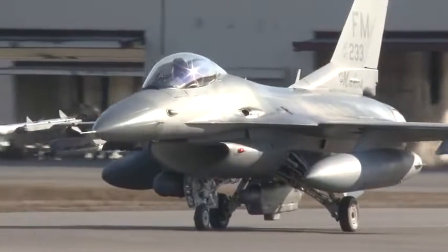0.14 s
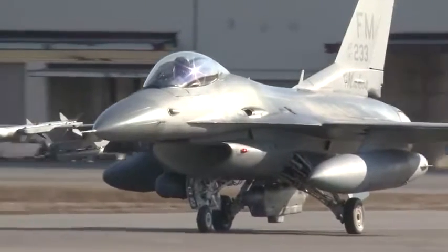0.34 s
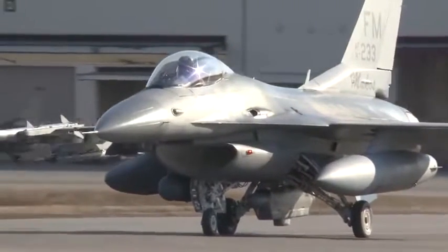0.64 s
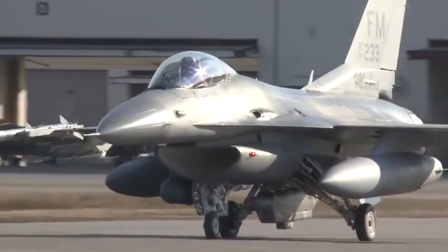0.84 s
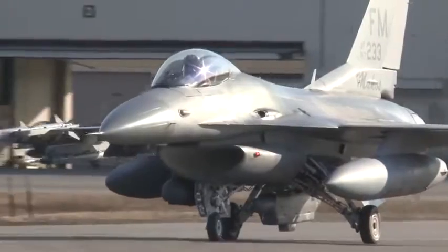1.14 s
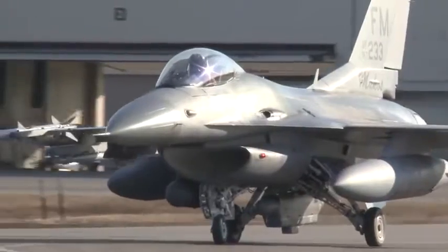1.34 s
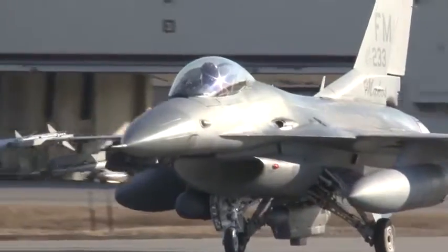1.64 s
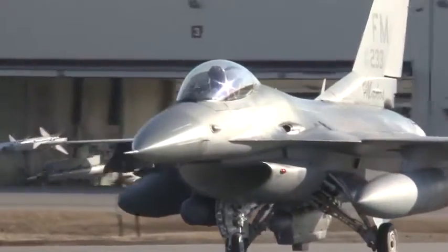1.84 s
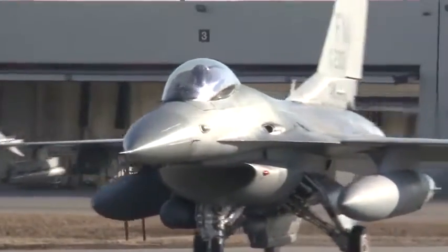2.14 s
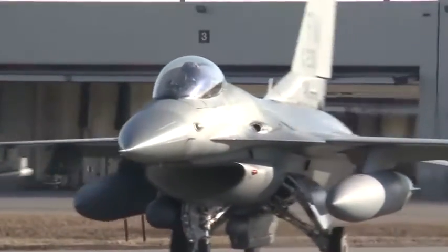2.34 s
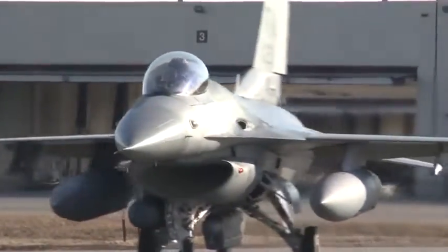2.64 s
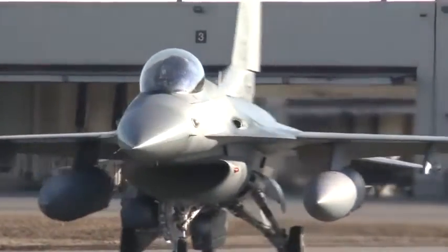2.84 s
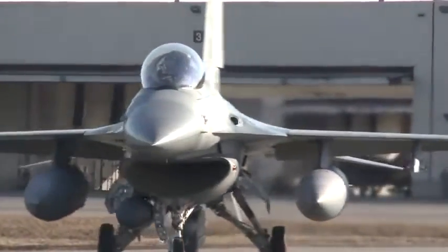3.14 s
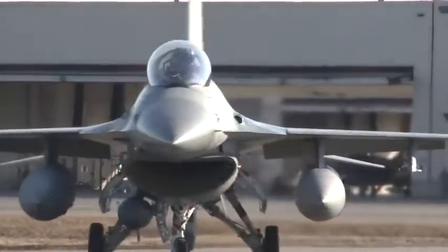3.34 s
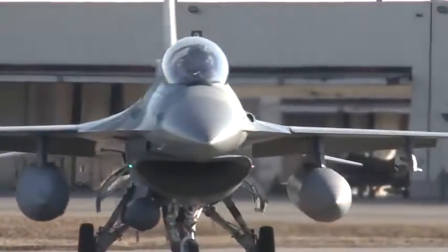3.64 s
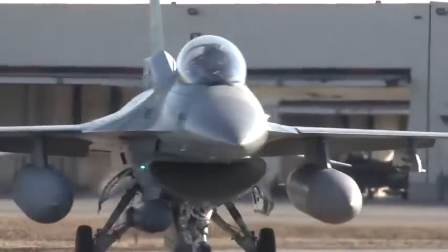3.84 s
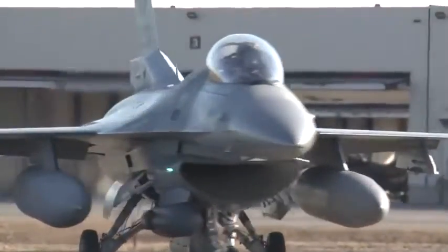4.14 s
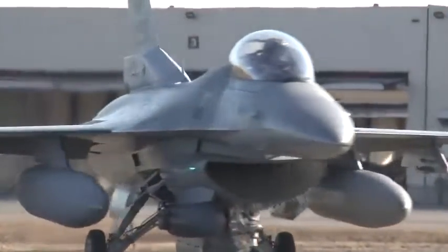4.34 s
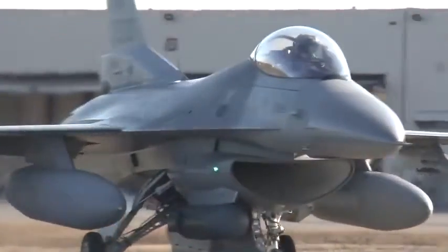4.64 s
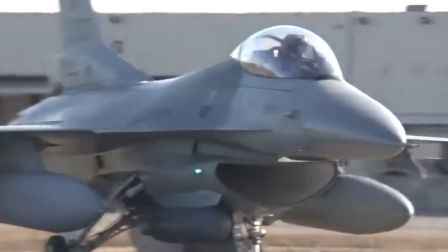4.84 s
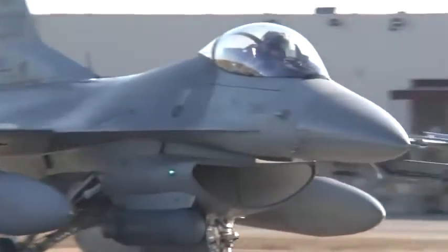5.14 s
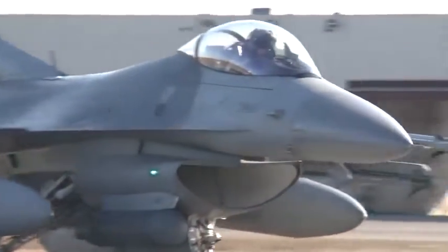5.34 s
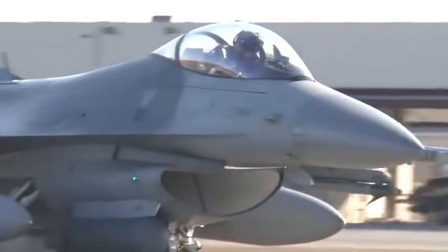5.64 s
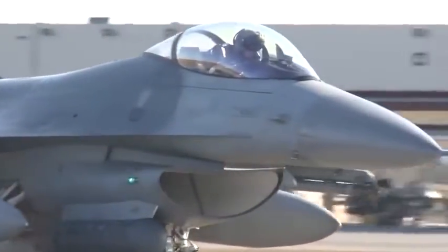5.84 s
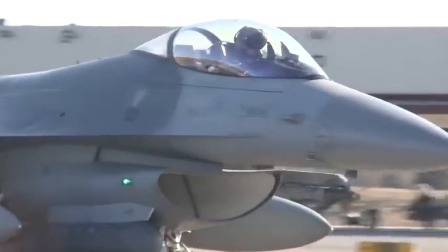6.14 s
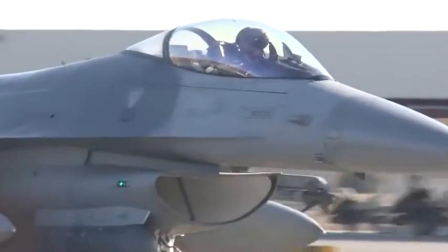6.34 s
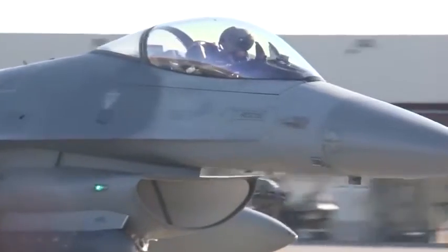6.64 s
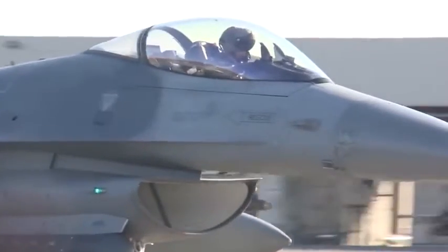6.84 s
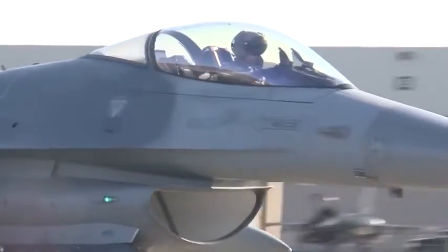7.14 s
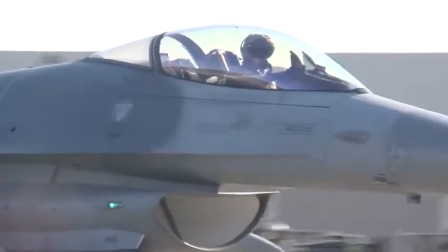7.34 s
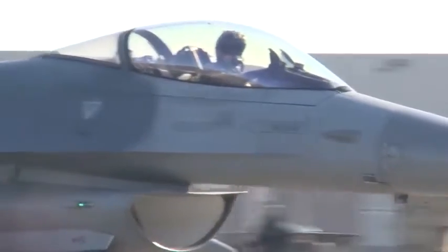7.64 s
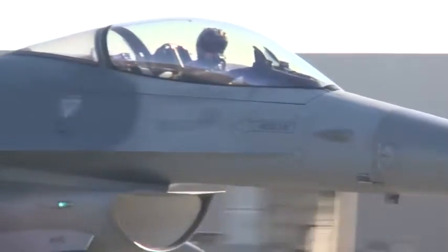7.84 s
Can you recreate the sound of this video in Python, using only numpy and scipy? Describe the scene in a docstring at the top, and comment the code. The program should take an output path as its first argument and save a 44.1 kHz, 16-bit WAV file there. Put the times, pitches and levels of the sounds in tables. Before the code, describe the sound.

On an open airfield, a taxiing fighter jet gives a steady but shivering high whine, rough and beating, over soft exhaust rumble. The rumble thins as the nose swings toward the listener, then the aircraft rolls past side-on and the airy roar, hiss and low rumble build to the end. The outdoor stereo pickup leans left and sounds slightly hollow.

```python
"""The fan whine of a fighter jet taxiing at idle: two engines' tones beat, smeared by turbulent air at the intake.
Turbulence chopped by the blades adds an octave, a roar and hiss; jet mixing behind makes the exhaust rumble and
rush, faintest while the nose points at the listener. The jet approaches, turns head-on and rolls by side-on,
with faint machinery tones and whistles. Short echoes colour everything hollow, differently in each channel."""
import sys
import numpy as np
from scipy.fft import rfft, irfft, next_fast_len
from scipy.io import wavfile
from scipy.ndimage import map_coordinates

SR = 44100
rng = np.random.default_rng(int(sys.argv[2]) if len(sys.argv) > 2 else 0)


def generate_wav(sig):
    """Save sig (samples, or channels by samples) to the path in sys.argv[1] as 16-bit PCM at SR."""
    pcm = np.round(np.clip(np.atleast_2d(sig).T, -1, 1) * 32767).astype(np.int16)
    wavfile.write(sys.argv[1], SR, pcm)


N = 352800  # samples: 8 s

# Blade-passing tone of the near engine's fan. Each row: time in seconds, mean pitch in Hz.
NEAR_FAN_PITCH = [(0, 1826), (2.2, 1825), (4.6, 1831), (6.2, 1821), (8, 1808)]
# Blade-passing tone of the second engine's fan. Each row: time in seconds, mean pitch in Hz.
SECOND_FAN_PITCH = [(0, 1840), (4, 1845), (5.7, 1852), (7, 1866), (8, 1868)]
# Power of the whine that arrives unscattered. Each row: time in seconds, near fan's share (0-1), second fan's share.
UNSCATTERED_SHARE = [(0, 0, 0.24), (.85, 0.15, 0.2), (1.08, 0.32, 0.46), (1.36, 0.54, 0.29),
                     (1.5, 0.06, 0.07), (2.3, 0.23, 0.16), (3.7, .52, .05), (4.8, 0.07, 0.18),
                     (6.5, 0.11, 0.2), (8, 0.04, 0.03)]
# Sound scattered round the fan tones, wider side-on.
# Each row: time in seconds, centre in Hz, share of the broad skirt in its power (0-1).
SCATTERED_HUMP = [(0, 1846, 0.3), (1.1, 1835, 0), (1.8, 1822, 0.26), (2.4, 1823, 0.16), (3.7, 1830, 0.13),
                  (4.7, 1842, 0.25), (5.5, 1852, 0.3), (6.5, 1843, 0.7), (7.3, 1870, 1), (8, 1852, 0.98)]
# The fan whine drifting in moving air. Each row: time in seconds, level in dB before fades and a small trim.
WHINE_LEVEL = [(0.0, -37), (0.4, -34.5), (0.56, -37.5), (1.28, -30), (1.76, -36.5), (1.92, -33.5),
               (2.72, -36), (4.4, -36), (4.72, -34), (5.28, -32.5), (5.48, -40), (5.6, -33), (5.92, -40),
               (6.16, -34), (6.88, -33.5), (7.08, -37.5), (7.56, -34.5), (8.0, -40.5)]
FADE_DB, FADE_RATE = 7, 45  # dB of fade per unit of eddy strength above 1, eddies a second


def fan_whine():
    """Scattering by turbulence: two beating fan tones stand in a noise hump centred near their pitch."""
    whine_db, = curves(WHINE_LEVEL)
    fade_db = FADE_DB * np.maximum(wobble(FADE_RATE) - 1, 0)  # only the strongest eddies make it fade
    centre_hz, broad = curves(SCATTERED_HUMP)
    near, second = curves(UNSCATTERED_SHARE)
    core = np.sqrt(1 - broad) * scatter(width_hz=76, steepness=6.5) * rotor(centre_hz)
    skirt = np.sqrt(broad) * scatter(width_hz=161, steepness=6.8) * rotor(centre_hz + 18)
    whine = (core + skirt) * np.sqrt(1 - near - second)
    for pitch_rows, share in (NEAR_FAN_PITCH, near), (SECOND_FAN_PITCH, second):
        pitch_hz, = curves(pitch_rows)
        unsteady_gain = amp(2.0 * wobble(12))
        tone = rotor(pitch_hz + 1.526 * wobble(9))
        whine[0] += np.sqrt(share) * unsteady_gain * tone
    whine = steadied(unit(whine), ceiling=2.5)
    return amp(whine_db - fade_db - 0.13) * unit(whine.real)


# The intake's octave and blade roar. Each row: time in seconds, guide level in dB that each layer offsets and scales.
INTAKE_LEVEL = [(0.0, -44.9), (0.12, -41), (0.24, -44.5), (0.92, -49.4), (1.8, -46.5), (2.96, -45),
                (4.12, -47), (4.52, -42.4), (4.92, -41), (5.48, -43), (5.64, -40), (5.92, -46.5),
                (6.28, -40), (6.72, -45), (7.32, -40), (7.52, -45), (8.0, -41.5)]
# The treble, strongest at the end. Each row: time in seconds, guide level in dB that each layer offsets and scales.
TREBLE_LEVEL = [(0.0, -59.5), (0.48, -65.6), (1.12, -64.5), (1.68, -68.5), (3.0, -60.5), (3.88, -65.5),
                (5.04, -59), (5.36, -62), (5.68, -59), (5.96, -62.5), (6.24, -56), (6.68, -57.5),
                (7.16, -52), (7.8, -52), (8.0, -46.5)]
# Spectrum of the blade roar. Each row: frequency in Hz, relative density in dB per Hz.
BLADE_SPECTRUM = [(1150, -32), (1950, -3.5), (2060, -7), (2350, 2), (2690, -2.5), (2980, -9.5), (3150, -37),
                  (4100, -33), (6930, -120)]
# Spectrum of the upper roar. Each row: frequency in Hz, relative density in dB per Hz.
UPPER_SPECTRUM = [(1790, -43), (3050, -4.5), (3530, 2.5), (3700, 2.5), (4160, -7), (4530, -8.5),
                  (4920, -22.5), (5100, -29), (6630, -40), (11200, -120)]
# Spectrum of the hiss. Each row: frequency in Hz, relative density in dB per Hz.
HISS_SPECTRUM = [(2940, -12.5), (5000, -4), (5380, 2.5), (5650, 1), (6830, -6), (7940, -4.5), (9300, -16.5),
                 (12100, -48), (20500, -120)]
# Spectrum of the finest hiss. Each row: frequency in Hz, relative density in dB per Hz.
FINE_SPECTRUM = [(5410, -38), (9200, -13.5), (9580, -13), (9820, -0.5), (10400, 0), (11700, -7),
                 (13700, -11.5), (14900, -8.5), (15800, -19)]
LOBE_S, LOBE_WIDTH_S, LOBE_DB = 1.66, 0.22, 2.5  # moment, spread and tilt of the roar as the intake swings round


def intake():
    """Blade-turbulence interaction: chopped inflow radiates the octave of the whine, broad roar and hiss."""
    centre_hz, _ = curves(SCATTERED_HUMP)
    octave_tone = (scatter(width_hz=47, steepness=2.7) * rotor(2 * centre_hz)).real
    octave = follow(INTAKE_LEVEL, offset_db=-9, swing=0.8) * octave_tone
    blades = follow(INTAKE_LEVEL, offset_db=1.3, swing=1.03) * amp(0.73 * wobble(22)) * rush(BLADE_SPECTRUM)
    upper = follow(INTAKE_LEVEL, offset_db=-3, swing=0.88) * amp(0.52 * wobble(22)) * rush(UPPER_SPECTRUM)
    hiss = follow(TREBLE_LEVEL, offset_db=6, swing=0.85) * rush(HISS_SPECTRUM)
    fine = follow(TREBLE_LEVEL, offset_db=-5, swing=1.17) * amp(0.44 * wobble(23)) * rush(FINE_SPECTRUM)
    # moving air makes all these layers flutter as one
    shimmer = amp(0.83 * wobble(6) + 0.55 * wobble(18) + 0.49 * wobble(55))
    lobe = amp(LOBE_DB * swell(LOBE_S, LOBE_WIDTH_S))  # darker: more blade roar, less upper roar
    return shimmer * (octave + blades * lobe + upper / lobe + hiss + fine)


# The exhaust, lowest while the nose points at the listener.
# Each row: time in seconds, guide level in dB that each layer offsets and scales.
EXHAUST_LEVEL = [(0.0, -50), (0.96, -52), (1.04, -50), (1.8, -55.5), (2.76, -59.5), (4.04, -59.7),
                 (4.6, -54.4), (5.4, -56.5), (5.56, -54.5), (6.68, -51), (6.92, -48.5), (8.0, -46.5)]
# Spectrum of the large eddies. Each row: frequency in Hz, relative density in dB per Hz.
RUMBLE_SPECTRUM = [(13, -82), (25, -56), (45, -34), (65, -24.5), (95, -13.5), (125, -6.5), (165, -3),
                   (195, 0), (240, -2.5), (300, -12), (430, -25), (730, -120)]
# Spectrum of the jet roar. Each row: frequency in Hz, relative density in dB per Hz.
JET_SPECTRUM = [(160, -39), (280, -2), (382, 0), (472, -2.5), (573, -3.5), (623, -1.5), (800, -13),
                (1040, -21), (1760, -120)]
# Spectrum of the smaller eddies' rush. Each row: frequency in Hz, relative density in dB per Hz.
RUSH_SPECTRUM = [(500, -35), (720, -2.5), (850, -4.5), (1030, 0), (1150, -1.5), (1350, -8), (1520, -1),
                 (1620, -5), (1720, 5), (2100, -29), (3500, -120)]


def exhaust():
    """Turbulent jet mixing: large eddies of hot gas and air rumble, smaller ones roar and rush."""
    rumble = follow(EXHAUST_LEVEL, offset_db=0.7, swing=1.12) * amp(0.75 * wobble(11)) * rush(RUMBLE_SPECTRUM)
    roar = follow(EXHAUST_LEVEL, offset_db=-0.6, swing=1.14) * rush(JET_SPECTRUM)
    small_eddies = follow(EXHAUST_LEVEL, offset_db=0.42, swing=0.74) * rush(RUSH_SPECTRUM)
    mixing = roar + small_eddies
    # close by, the reflection off the pavement partly cancels one band
    cancelled = filtered(mixing, lambda hz: np.exp(-((hz - 835) / 70) ** 2))
    mixing = mixing - 0.56 * swell(5.8, 2.2) * cancelled
    return rumble + amp(0.59 * wobble(14)) * mixing


# Tones of the gearbox and compressor. Each row: mean pitch in Hz, width of the pitch wander in Hz,
# mean peak level in dB, centre of the swell in seconds, its spread (standard deviation) in seconds.
MACHINE_TONES = [(638, 4, -62, 7.3, 1.1), (797, 5, -67.5, 5.7, .9), (856, 5, -64.5, 5.1, .85),
                 (1027, 2, -60.5, 1.9, .55), (1274, 4, -66, 7, 1.6)]
# Narrow bands of booming and whistling noise. Each row: centre in Hz, bandwidth in Hz,
# peak level in dB, centre of the swell in seconds, its spread (standard deviation) in seconds.
NOISE_BANDS = [(195, 43, -43.5, 8.12, 0.6), (2196, 220, -45.5, 7.8, 1.6), (2690, 150, -50.5, 8, 5.4),
               (3433, 59, -55, 3.8, 2.5), (3870, 140, -52.5, 8.3, 1.597), (5670, 140, -65, 9, 1.4),
               (10100, 110, -69, 9.6, 4.1)]


def machinery():
    """Rotation and resonance: wavering tones and narrow noise bands, each swelling round its own moment."""
    out = np.zeros((2, N))
    for hz, width_hz, db, when, span in MACHINE_TONES:
        tone = rotor(hz + width_hz / 2 * wobble(12)).real
        out[0] += amp(db + 2.1 * wobble(6.2)) * swell(when, span) * tone
    for hz, width_hz, db, when, span in NOISE_BANDS:
        noise = rng.standard_normal((2, N))
        whistle = unit(filtered(noise, lambda f: 1 / (1 + (2 * (f - hz) / width_hz) ** 2)))
        out += amp(db) * swell(when, span) * whistle
    return out


# Balance of the two channels. Each row: frequency in Hz, left minus right in dB.
LEFT_MINUS_RIGHT = [(60, 7), (110, 17.5), (200, 11), (380, 6), (700, 7), (1290, 8), (1830, 9.5), (2050, 9),
                    (2400, 16), (2800, 11), (3500, 1.5), (8300, 0.5), (9800, 14.5), (15000, 16)]
# Correlation of the two channels. Each row: frequency in Hz, likeness from -1 to 1.
LEFT_RIGHT_LIKENESS = [(60, .5), (130, 0.49), (240, 0.91), (400, -0.38), (640, -0.49), (850, -0.57),
                       (1250, -0.48), (1800, -0.75), (2150, -0.68), (2350, 1), (4500, 0.75), (8000, 1),
                       (9500, 0.2), (15000, .2)]


def stereo(pair):
    """Interchannel coherence: a main signal and its diffuse partner fill left and right, their mean level kept."""
    def mixing(hz):
        lean = amp(along(LEFT_MINUS_RIGHT, hz) / 2)
        alike = np.clip(along(LEFT_RIGHT_LIKENESS, hz), -0.98, 0.98)
        mean_level = np.sqrt(lean ** 2 + lean ** -2 + 2 * alike) / 2
        left = [lean, 0 * lean]  # gains of the main signal and the diffuse partner
        right = [alike / lean, np.sqrt(1 - alike ** 2) / lean]
        return np.array([left, right]) / mean_level
    return filtered(pair, mixing).sum(axis=1)


# Short echoes. Each row: delay in seconds, gain on the left, gain on the right (negative inverts).
EARLY_ECHOES = [(.00485, 0, .1), (.00767, .09, -.04), (.01855, -.11, .18), (.02119, .05, 0),
                (.02462, .06, 0)]


def echoes(x):
    """Comb filtering: weak early copies interfere with the direct sound differently in each channel."""
    out = x.copy()
    for delay, left, right in EARLY_ECHOES:
        delayed = np.pad(x, ((0, 0), (round(delay * SR), 0)))[:, :N]
        out += np.array([[left], [right]]) * delayed
    return out


SURGE_S, SURGE_WIDTH_S, SURGE_DB = 1.918, 0.068, 6  # moment, spread and height of a brief common swell


def follow(rows, offset_db, swing):
    """Common modulation: a gain scales a level curve about its mean, and shares the intake and exhaust surge."""
    db, = curves(rows)
    mean_db = db.mean()
    surge_db = SURGE_DB * swell(SURGE_S, SURGE_WIDTH_S)
    return amp(mean_db + offset_db + swing * (db - mean_db) + surge_db)


def scatter(width_hz, steepness):
    """Spectral broadening: two random complex gains spread a tone into a hump of this half-power width."""
    hz = np.fft.fftfreq(N, 1 / SR)
    hump = 1 / np.sqrt(1 + np.abs(2 * hz / width_hz) ** steepness)
    noise = rng.standard_normal((2, N)) + 1j * rng.standard_normal((2, N))
    return unit(np.fft.ifft(hump * noise))


def rotor(pitch_hz):
    """Phase is the integral of frequency: a turning phasor whose real part has rms 1."""
    return np.sqrt(2) * np.exp(2j * np.pi * np.cumsum(pitch_hz) / SR)


def rush(colour):
    """Spectral shaping: two unrelated noises of joint rms 1 take the given spectrum."""
    return unit(filtered(rng.standard_normal((2, N)), lambda hz: amp(along(colour, hz))))


def steadied(z, ceiling):
    """Soft saturation: the tallest swells of a complex gain are rounded off."""
    return unit(z / (1 + np.abs(z / ceiling) ** 4) ** (1 / 4))


def swell(when, span):
    """Gaussian envelope: a smooth rise and fall to 1 round one moment, both in seconds."""
    return np.exp(-0.5 * ((np.arange(N) / SR - when) / span) ** 2)


def wobble(rate):
    """Slow random modulation: a smooth curve through random knots, rate knots a second."""
    knots = rng.standard_normal(1024)
    coarse = np.arange(0, N + 64, 64)
    smooth = map_coordinates(knots, [coarse * rate / SR], mode="wrap")
    return np.interp(np.arange(N), coarse, smooth)


def curves(rows):
    """Linear interpolation in time: one value per sample for each column after the time."""
    s, *cols = np.transpose(rows)
    return [np.interp(np.arange(N) / SR, s, c) for c in cols]


def along(points, hz):
    """Logarithmic frequency scale: (Hz, value) points read between their neighbours."""
    f, v = np.transpose(points)
    return np.interp(np.log(hz + 1), np.log(f), v)


def filtered(x, response):
    """Linear filtering: the spectrum of x times a response of frequency."""
    m = next_fast_len(N + 8192)
    return irfft(rfft(x, m) * response(np.fft.rfftfreq(m, 1 / SR)), m)[..., :N]


def amp(db):
    """Decibel law: level to amplitude gain."""
    return 10 ** (np.asarray(db) / 20)


def unit(x):
    """Normalisation by mean power: scale to rms 1."""
    return x / np.sqrt(np.mean(np.abs(x) ** 2) + 1e-20)


def scene():
    """Superposition: all engine sounds add, then spread in stereo and echo."""
    return echoes(stereo(fan_whine() + intake() + exhaust() + machinery()))


TOP_HZ = 15780  # upper band limit


def record(dry):
    """Band limiting: a narrow dip hollows the treble and nothing passes above the limit."""
    def response(hz):
        hollow_db = 7 * np.exp(-((hz - 5040) / 80) ** 2)
        return amp(-hollow_db) * (hz < TOP_HZ)
    return filtered(dry, response)


dry = scene()
out = record(dry)
generate_wav(out)
```